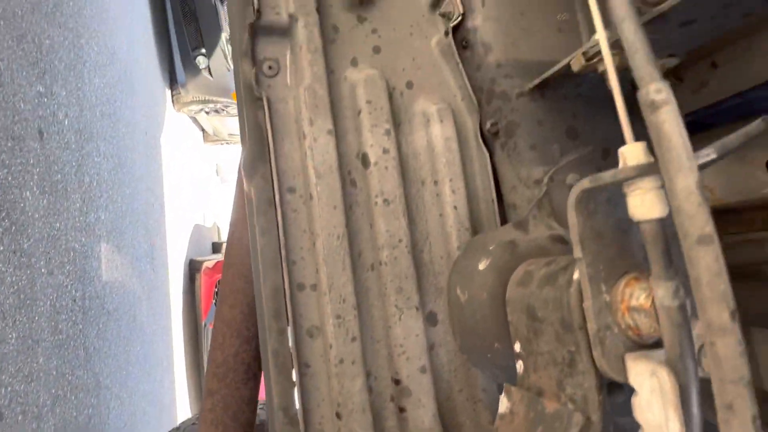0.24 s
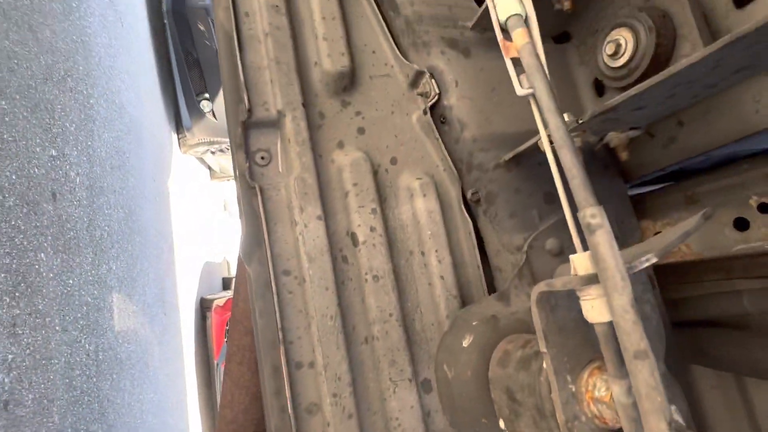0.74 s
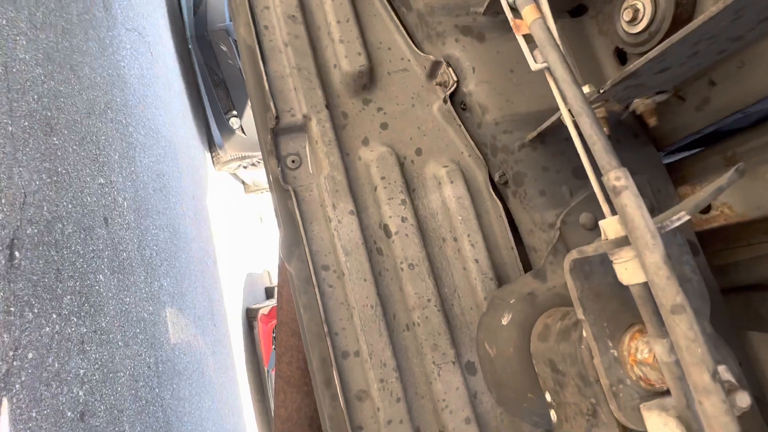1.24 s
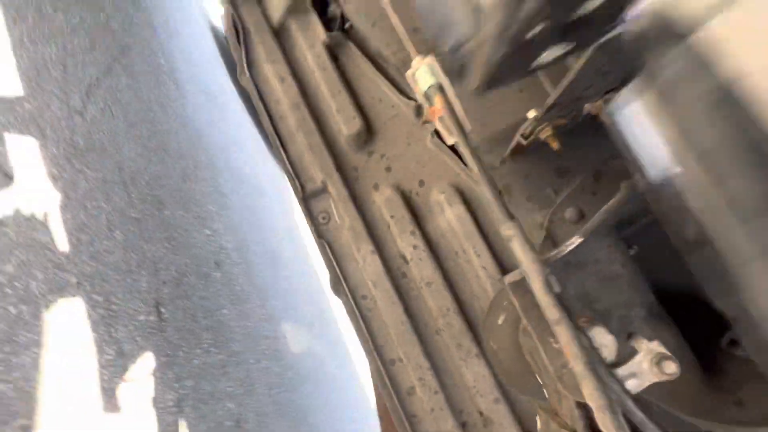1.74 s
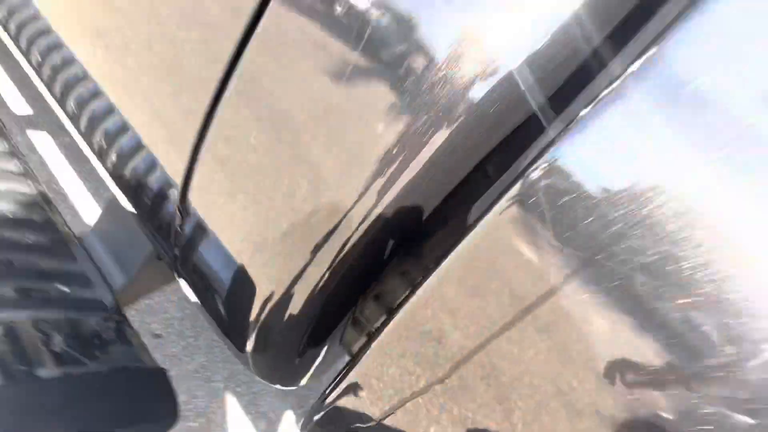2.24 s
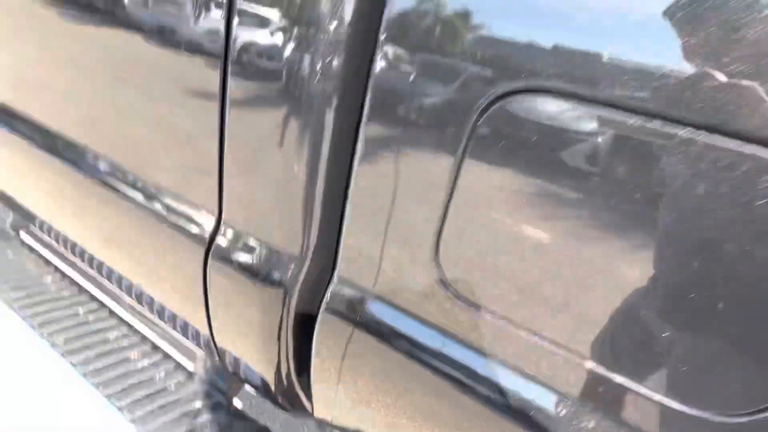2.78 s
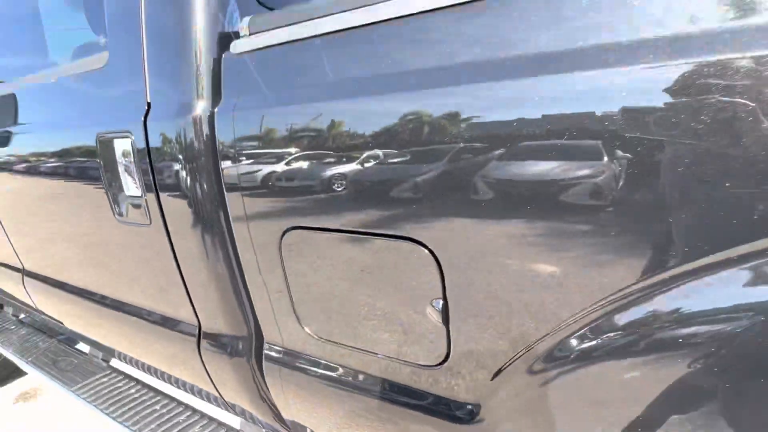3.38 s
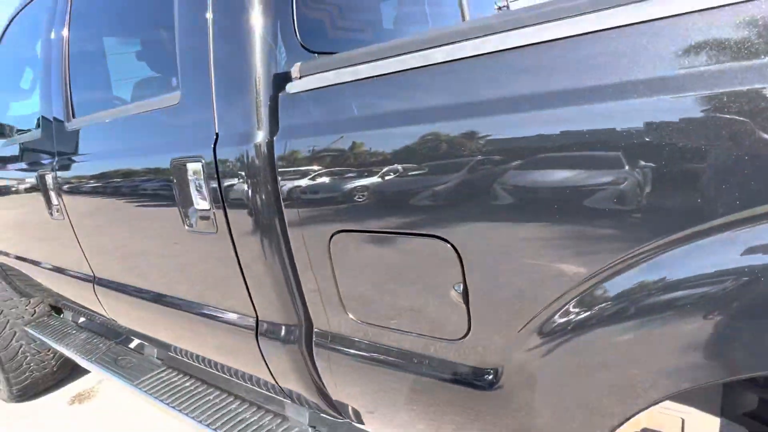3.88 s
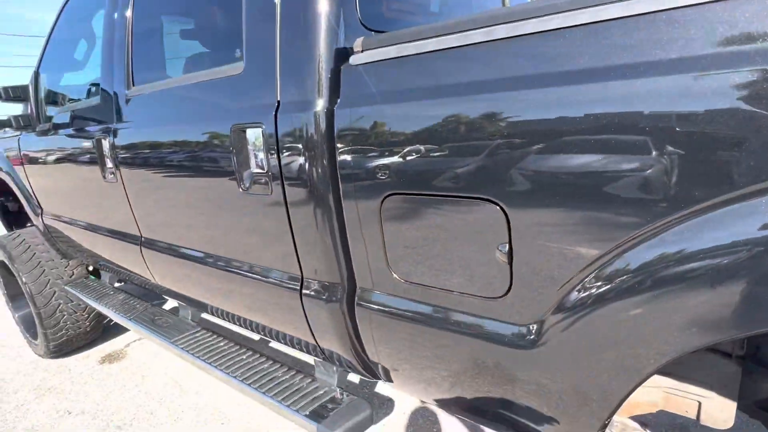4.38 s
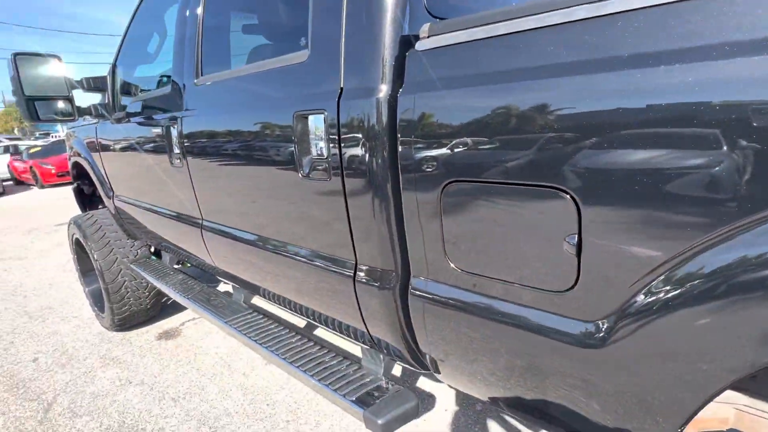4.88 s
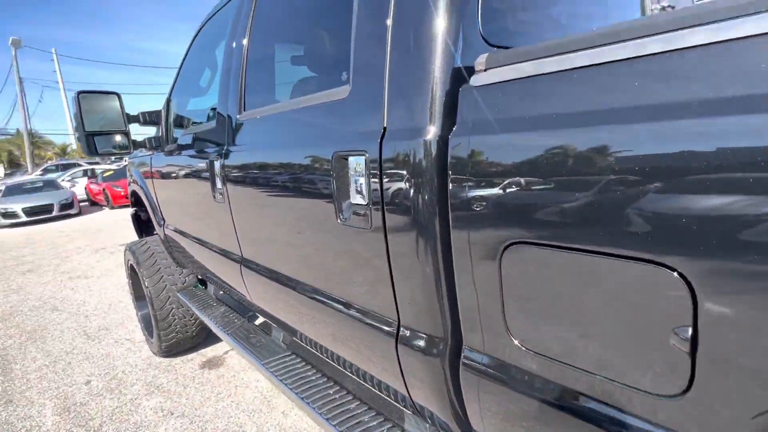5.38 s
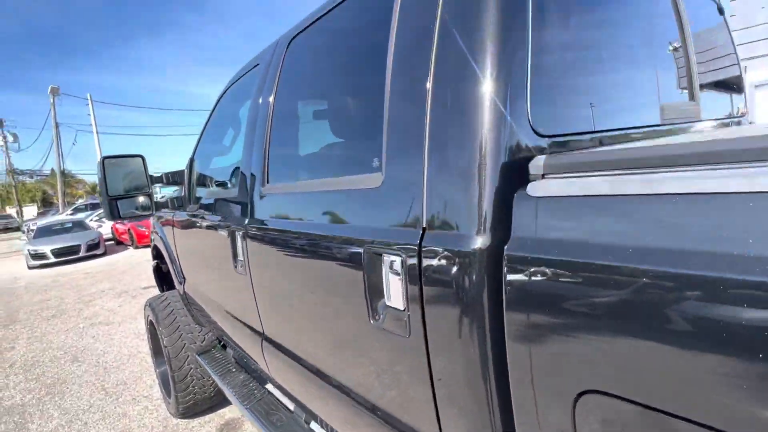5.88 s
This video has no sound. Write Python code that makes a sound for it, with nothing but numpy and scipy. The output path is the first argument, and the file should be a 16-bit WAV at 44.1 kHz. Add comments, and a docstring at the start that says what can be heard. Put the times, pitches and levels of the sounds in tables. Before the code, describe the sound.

Outdoors on a paved lot, a handheld stereo camera starts under a truck: coarse pulsing clatter, metallic chatter and resonant hollow tones over a buzzing idle. Pulled out along the side, it hears softer idling, lumpy low exhaust puffs, airy hiss and a faint narrow whine. Handling thumps and small dry clicks mark the move, then a sharp knock rings the case late.

```python
"""A pickup truck idles on a dealer lot; a camera with two microphone ports is drawn out and along its side.
First, by the frame rail and under the floor, engine lines drone, noise pulsed by the firings clatters, struck
steel rattles and resonant noise rings in the gap above the asphalt. A slower V8 throbs and puffs throughout.
From about 1.7 s the truck recedes in the open: a third motor hums in rising sines and a faint whine passes.
The hand thumps and ticks the camera from 1.8 s on, and a hard tap rings its case near 5.8 s."""
import sys
import numpy as np
from scipy import signal
from scipy.fft import rfft, irfft, next_fast_len
from scipy.io import wavfile
from scipy.ndimage import uniform_filter1d, map_coordinates

SR = 44100
rng = np.random.default_rng(int(sys.argv[2]) if len(sys.argv) > 2 else 0)


def wav_out(sig):
    """Save sig, one row per channel (or a flat mono array), as 16-bit PCM at SR to the path in sys.argv[1]."""
    wavfile.write(sys.argv[1], SR, np.round(np.clip(np.atleast_2d(sig).T, -1, 1) * 32767).astype(np.int16))


N = 270200

TRUCK_FIRING_HZ = 53.3  # mean firings a second
V8_CRANK_HZ = 10.005  # mean turns a second
# the microphone leaves the space under the body: (time [s], fade [s])
LEAVES_BODY = (1.89, 0.49)
# resonances of panels and cavities under the body: (centre [Hz], width [Hz], lift [dB])
UNDER_RESONANCES = [(509, 96, 10.5), (651, 59, 6.5), (868, 30, 10), (2560, 73, 1), (3500, 81, -1)]


def amp(db):
    """Decibels to gain."""
    return 10 ** (np.asarray(db) / 20)


def unit(x):
    """Scale to rms 1."""
    return x / np.sqrt(np.mean(x ** 2) + 1e-20)


def clock():
    """Seconds at each sample."""
    return np.arange(N) / SR


def along(points, hz):
    """Read (frequency [Hz], value) points on a log frequency axis."""
    f, v = np.transpose(points)
    return np.interp(np.log(hz + 1), np.log(f + 1), v)


def curves(rows):
    """One value per sample for each column after the time."""
    s, *columns = np.transpose(rows)
    return [np.interp(clock(), s, column) for column in columns]


def wobble(rate):
    """A smooth random curve, rate knots a second."""
    knots = rng.standard_normal(int(N * rate / SR) + 4)
    return map_coordinates(knots, [np.arange(N) * rate / SR])


def until(s, fade_s):
    """Falls smoothly from 1 to 0, through one half at the time s."""
    return .5 - .5 * np.tanh((clock() - s) / (2 * fade_s))


def swells(rows):
    """Smooth rises or dips in dB, one for each (time [s], change [dB], half-width [s]) row."""
    return sum(db * np.exp(-((clock() - s) / width_s) ** 2) for s, db, width_s in rows)


def by_distance(far_db, growth):
    """A layer's level in dB: far_db far from the truck's engine, plus growth dB for each dB of nearness."""
    # the truck gets quieter as the microphone draws away from its engine: (time [s], level [dB])
    engine_level = [(0, -25.5), (0.2, -26.5), (0.56, -30.5), (0.82, -29), (1.3, -31), (1.85, -34.5),
                    (3.1, -36), (4.1, -40.5), (6.13, -41.5)]
    nearness_db = curves(engine_level)[0] + 41
    return far_db + growth * nearness_db


def places():
    """Gains of the engine lines at two places: beside the frame rail, then below the floor pan."""
    at_rail = until(.43, fade_s=.1)
    below_floor = (1 - at_rail) ** 2 * np.sqrt(until(*LEAVES_BODY))
    return amp(7.5) * at_rail, amp(by_distance(far_db=-17, growth=2.15)) * below_floor


def filtered(x, response):
    """x times a response of frequency."""
    m = next_fast_len(N + SR // 4)
    hz = np.fft.rfftfreq(m, 1 / SR)
    return irfft(rfft(x, m) * response(hz), m)[..., :N]


def rush(spectrum, resonances=()):
    """Stereo noise of rms 1 through resonances; part of it is shared by both ports."""
    # likeness of the two ports: (frequency [Hz], correlation [-1 to 1])
    likeness = [(100, 0.81), (200, 0.71), (340, 0.4), (520, 0.2), (1000, 0.3), (2000, 0.33), (5000, 0.2),
                (9000, 0.25), (12000, 0.45)]

    def response(hz):
        db = along(spectrum, hz)
        for centre, width, lift_db in resonances:
            db = db + lift_db / (1 + (2 * (hz - centre) / width) ** 2)
        angle = np.arccos(np.clip(along(likeness, hz), -1, 1)) / 2
        return amp(db) * [np.cos(angle), np.sin(angle)]

    mid, side = filtered(rng.standard_normal((2, N)), response)
    return unit(np.array([mid + side, mid - side]))


def ring(hz, db, half_width_hz):
    """Stereo noise in one resonance whose pitch and level may move."""
    lowpass = lambda f: 1 / (1 + (f / half_width_hz) ** 2)
    narrow = filtered(rng.standard_normal((2, 2, N)), lowpass)
    # both ports share most of it
    narrow = narrow + 3 * narrow.mean(0)
    # two slow noises on a cosine and a sine make a band around hz
    angle = 2 * np.pi * np.cumsum(hz) / SR
    return amp(db) * unit(narrow[:, 0] * np.cos(angle) + narrow[:, 1] * np.sin(angle))


def spin(hz, unsteady):
    """Cycles made so far by a shaft whose speed hunts by about the share unsteady."""
    return np.cumsum(hz * (1 + unsteady * wobble(7))) / SR


def tone(turns):
    """A sine of rms 1 that follows the turns from a random phase."""
    return np.sqrt(2) * np.sin(2 * np.pi * (turns + rng.random()))


def firings(turns, depth, uneven_db, count):
    """A swell at each firing; each of the count cylinders has its own strength."""
    cylinder_db = uneven_db * unit(rng.standard_normal(count))
    strength = amp(cylinder_db[turns.astype(int) % count])
    return unit(1 + depth * strength * np.sin(np.pi * turns) ** 4)


def strikes(turns, per_firing, scatter_s):
    """Sample numbers of blows at each firing, each a random moment early or late."""
    moments = np.flatnonzero(np.diff((turns + .5).astype(int)))
    beats = np.repeat(moments, per_firing)
    shift = (rng.standard_normal(len(beats)) * scatter_s * SR).astype(int)
    return np.clip(beats + shift, 0, N - 1)


def drone(turns):
    """The truck's engine lines; standing waves under the body favour different ones at each place."""
    # the firing tone dips and swells briefly: (time [s], change [dB], half-width [s])
    firing_swells = [(.36, -11, 0.096), (.72, 5.5, 0.3), (1.0, -6, 0.16), (1.66, -11, 0.11),
                     (1.88, -4, .15)]
    # the microphone passes antinodes of the third harmonic: (time [s], change [dB], half-width [s])
    boom_swells = [(.5, 4.5, 0.17), (1.12, 11, 0.29), (2.15, 5.5, 0.34)]
    # other lines: (multiple of a third of the firing rate, relative level at the rail [dB], under the floor [dB])
    shaft_lines = [(6, -35, -36), (7, -40, -60), (8, -54, -43), (10, -40, -45), (11, -40, -36),
                   (12, -34, -44), (14, -39, -38), (15, -37, -47), (16, -57, -48), (17, -34, -60),
                   (18, -34, -52), (19, -42, -50), (20, -35, -53), (21, -34, -51), (22, -49, -51),
                   (28, -40, -48), (34, -56, -51), (36, -62, -49), (37, -44, -53), (40, -47, -62),
                   (45, -50, -58), (49, -46, -49)]

    firing = amp(by_distance(far_db=-33.5, growth=.43) + swells(firing_swells))
    firing = firing * until(2.1, fade_s=.11)  # lost in the open
    inside = until(2.41, fade_s=.01)
    boom_inside = amp(-33.2 + swells(boom_swells))
    boom_open = amp(by_distance(far_db=-54.5, growth=1.6))
    boom = inside * boom_inside + (1 - inside) * boom_open
    main = firing * tone(turns) + boom * tone(3 * turns)

    rail, floor = places()
    lines = 0
    for multiple, rail_db, floor_db in shaft_lines:
        level = np.hypot(rail * amp(rail_db), floor * amp(floor_db))
        lines = lines + level * amp(1.1 * wobble(4.7)) * tone(multiple * turns / 3)

    # one line stands under the floor pan for a while
    below_pan = (1 - until(.53, fade_s=.037)) * until(1.14, fade_s=.063)
    pan = amp(-34.5 + wobble(4.66)) * below_pan * tone(19 * turns / 3)
    return main + pan + amp(-5.5) * lines


def clatter(turns, v8_turns):
    """Knock and fan rush: noise pulsing with the truck's firings under the body, with the V8's in the open."""
    # noise spectra under the body and beside it: (frequency [Hz], relative density [dB per Hz])
    under_spectrum = [(100, -1.5), (200, -0.5), (340, -3), (430, -12), (560, -14), (900, -8.5),
                      (1300, -4.5), (2000, -13), (3500, -19.5), (4500, -20), (7000, -28), (9000, -30.5),
                      (12000, -35.5), (15500, -39)]
    beside_spectrum = [(85, -11), (170, 0.5), (270, -5.5), (420, -2.5), (620, -4.5), (900, -3.5),
                       (1300, -3.5), (2100, -13), (3000, -15.5), (4700, -26.5), (6600, -25), (9000, -31),
                       (12000, -33), (15500, -37)]
    # resonances in the open: (centre [Hz], width [Hz], lift [dB])
    beside_resonances = [(286, 49, 3.5), (588, 81, 4), (1067, 140, 3.4), (1200, 39, 1.2), (1740, 250, 1),
                         (2220, 330, 1.1), (3160, 260, 1.2), (4680, 870, 9.3), (6400, 380, 3)]
    # the hiss swells gently along the truck's side: (time [s], change [dB], half-width [s])
    hiss_swells = [(4.6, 2.5, 0.85)]

    cover = until(*LEAVES_BODY)
    under = rush(under_spectrum, UNDER_RESONANCES) * firings(turns, depth=.2, uneven_db=3, count=6)
    beside = rush(beside_spectrum, beside_resonances)
    beside = beside * firings(4 * v8_turns, depth=.28, uneven_db=3, count=8)
    both = flicker(patches(np.sqrt(cover) * under + np.sqrt(1 - cover) * beside))

    # the truck's body shades the treble differently from the midrange
    treble = filtered(both, lambda hz: 1 / (1 + (2300 / (hz + 1)) ** 4))
    clatter_db = by_distance(far_db=-37.5, growth=.94) + .68 * wobble(20)
    # the floor pan throws extra hiss down at the microphone
    hiss_db = by_distance(far_db=-37, growth=.13) + 9.5 * cover + swells(hiss_swells) + .52 * wobble(25)
    return amp(clatter_db) * (both - treble) + amp(hiss_db) * treble


def patches(x):
    """Reflections off asphalt and panels lift and sink narrow bands as the microphone moves."""
    # the midrange is coloured most: (frequency [Hz], depth of the patches [dB])
    patch_depth = [(400, 1.8), (1200, 1.5), (2500, 1.2), (8000, 1)]
    hz, _, z = signal.stft(x, SR, nperseg=1024)
    field = uniform_filter1d(rng.standard_normal(z.shape[1:]), size=3, axis=0)
    field = unit(uniform_filter1d(field, size=32, axis=1))
    gain = amp(along(patch_depth, hz)[:, None] * field)
    return signal.istft(z * gain, nperseg=1024)[1][:, :N]


def flicker(x):
    """Different parts ring out by turns: short, narrow patches of the clatter flare and sink."""
    z = signal.stft(x, SR, nperseg=256)[2]
    field = uniform_filter1d(rng.standard_normal(z.shape[1:]), size=7, axis=1)
    field = unit(uniform_filter1d(field, size=2, axis=0))
    gain = unit(amp(2.8 * np.tanh(field)))
    return signal.istft(z * gain, nperseg=256)[1][:, :N]


def knocks(turns):
    """Each combustion lands as two hard raps of uneven strength; they fade with distance and behind the body."""
    # noise spectrum of the raps: (frequency [Hz], relative density [dB per Hz])
    knock_spectrum = [(250, -44), (500, 6), (900, 1.5), (1500, 1), (2000, -27), (3500, -16), (7000, -40),
                      (12000, -60)]
    t60 = .032  # s
    at = strikes(turns, per_firing=2, scatter_s=.0045)
    strength = amp(3 * np.tanh(rng.standard_normal(len(at))))
    blows = np.bincount(at, strength, N)
    decay = amp(-60 * np.arange(SR // 20) / SR / t60)
    bursts = unit(signal.oaconvolve(blows, decay)[:N])
    level = amp(by_distance(far_db=-45.5, growth=.85)) * until(*LEAVES_BODY)
    return level * bursts * rush(knock_spectrum, UNDER_RESONANCES)


def turned(x):
    """As the camera turns, the sound reaches one microphone port before the other."""
    # (time [s], lag of the left port behind the right [ms])
    port_lag = [(0, .15), (.6, .3), (1.3, -.4), (1.8, -.35), (2.3, -.39), (2.6, .36), (3.4, .35), (3.8, .2),
                (4.15, -.17), (6.1, -.12)]
    lag = curves(port_lag)[0] * SR / 1000  # samples
    left = map_coordinates(x[0], [np.arange(N) - .5 * lag], order=5)
    right = map_coordinates(x[1], [np.arange(N) + .5 * lag], order=5)
    return np.array([left, right])


def gap_ring(turns):
    """The knock rings in the gaps between truck and asphalt: resonant noise at moving, wavering pitches."""
    # three rings between floor pan and asphalt, one list each: (time [s], pitch [Hz], level [dB])
    floor_rings = [
        [(.2, 1376, -42), (.28, 1396, -33.5), (.52, 1386, -32.5), (.68, 1450, -33), (.77, 1494, -38.5),
         (.95, 1503, -46), (1.3, 1519, -38)],
        [(0, 1240, -51), (.14, 1250, -25.5), (.3, 1243, -50), (.6, 1254, -46), (.72, 1250, -34),
         (.83, 1260, -28.5), (.89, 1307, -30.5), (.97, 1290, -42), (1.08, 1308, -33), (1.19, 1315, -38),
         (1.27, 1386, -34), (1.42, 1400, -48)],
        [(.75, 1986, -66), (.86, 2000, -45), (.95, 1878, -44), (1.25, 1903, -44), (1.45, 1920, -62)],
    ]
    # a broad hollow tone between microphone, asphalt and body side: (time [s], pitch [Hz])
    hollow_pitch = [(0, 586), (.8, 860), (2.8, 877.3), (4.6, 435.3)]
    # it swells at the edge of the body and along its side: (time [s], change [dB], half-width [s])
    hollow_swells = [(1.35, 8.5, 0.4), (5.2, 2.5, 0.67)]

    narrow = 0
    for hz, db in map(curves, floor_rings):
        narrow = narrow + ring(hz * (1 + .012 * wobble(24)), db, half_width_hz=35)
    hollow_db = by_distance(far_db=-53.5, growth=.68) + swells(hollow_swells)
    hollow = ring(curves(hollow_pitch)[0], hollow_db, half_width_hz=210)
    under_floor = until(1.49, fade_s=.095)
    return (under_floor * narrow + hollow) * firings(turns, depth=.5, uneven_db=4, count=6)


def rattle(turns):
    """Each firing jolts steel parts on the frame; they chatter three times, a little early or late."""
    # ringing steel parts: (frequency [Hz], relative level [dB], t60 [s])
    steel_parts = [(1590, 4, .04), (1766, 1, .11), (2050, 0, .019), (2310, -.5, .045), (2600, 1.5, .04),
                   (2930, 4, .012), (3490, 0, .05), (4100, -4, .01), (5020, -6, .035), (5600, -4.5, .015)]
    # dry scrape of the jolts: (frequency [Hz], relative density [dB per Hz])
    scrape_spectrum = [(900, -31), (2200, 3), (5000, -3), (7500, -7.5), (12000, -41)]

    t, ringing = np.arange(SR // 20) / SR, np.zeros((2, N))
    for hz, db, t60 in steel_parts:
        at = strikes(turns, per_firing=3, scatter_s=.0042)
        jolts = np.zeros((2, N))
        jolts[:, at] = rng.standard_normal((2, len(at)))
        part = amp(db - 60 * t / t60) * np.sin(2 * np.pi * hz * t)
        ringing += signal.oaconvolve(jolts, part[None], axes=1)[:, :N]
    scrape = rush(scrape_spectrum) * firings(turns, depth=.5, uneven_db=3, count=6)
    rail, floor = places()
    # the body hides the rattle once the microphone is out in the open
    level = (amp(-36) * rail + amp(-48.5) * floor) * until(*LEAVES_BODY)
    return level * unit(unit(ringing) + amp(-9) * scrape)


def slow_v8(turns):
    """A deep exhaust throb, four firings a turn, with the side orders of uneven cylinders."""
    # (multiple of the crank rate, mean level [dB])
    crank_orders = [(5.0, -60), (6.0, -61), (6.5, -46), (7.0, -54), (7.5, -58), (8.0, -42.8), (9.0, -48),
                    (10.0, -55.6), (11.0, -59.5), (12.0, -50), (13.5, -52), (14.0, -59), (14.5, -58),
                    (15.5, -59.5), (16.0, -50), (17.0, -76), (18.0, -61), (19.0, -54.5), (19.5, -68),
                    (20.0, -61), (22.5, -66.7), (23.0, -70), (23.5, -58), (24.0, -60), (32.5, -60),
                    (40.0, -74)]
    throb = amp(-38 + .8 * wobble(3.44)) * tone(4 * turns)
    orders = sum(amp(db + 1.5 * wobble(2)) * tone(multiple * turns) for multiple, db in crank_orders)
    # the space under the truck booms on the third harmonic of the throb
    boom = amp(-35) * until(*LEAVES_BODY) * tone(12 * turns)
    return throb + orders + boom


def rumble(v8_turns):
    """Exhaust gas leaves in lumpy puffs: low noise swelling at each V8 firing."""
    # (frequency [Hz], relative density [dB per Hz])
    gas_spectrum = [(20, -50), (30, -28), (43, -4), (48, 6), (58, 5.5), (80, 5.5), (112, -1), (140, -10),
                    (200, -27), (350, -53), (700, -78)]
    # (time [s], change [dB], half-width [s])
    gas_swells = [(1.9, 5.5, 0.59), (4.2, 3, 0.3)]
    gas = rush(gas_spectrum) * firings(4 * v8_turns, depth=.71, uneven_db=1, count=8)
    return amp(by_distance(far_db=-41, growth=.45) + swells(gas_swells)) * gas


def motor():
    """A third motor comes out from behind the truck; its harmonics creep up in pitch and fade."""
    # (multiple of the base tone, level before the fade-in [dB] as it emerges, fall [dB per s])
    motor_orders = [(1, -32, .3), (2, -32, 2.3), (3, -42.5, 2.2), (5, -44, 2.8), (6, -50, 2.2)]
    # its lowest tone dips briefly: (time [s], change [dB], half-width [s])
    lowest_dips = [(3.2, -9, 0.31), (4.6, -10, .15), (5.0, -5, 0.25)]
    emerges_s = 1.66
    turns = spin(53.6 + .17 * clock(), unsteady=.0026)  # Hz, creeping up in Hz per s
    since = clock() - emerges_s
    lowest, *upper = [amp(db - fall * since + 1.2 * wobble(4)) * tone(multiple * turns)
                      for multiple, db, fall in motor_orders]
    emerged = 1 - until(emerges_s, fade_s=.64)
    return emerged * (amp(swells(lowest_dips)) * lowest + sum(upper))


def bumps():
    """The grip shifts: soft pushes thump the camera, and a hard tap rings the modes of its case."""
    # soft pushes: (time [s], level [dB])
    pushes = [(1.83, -22), (2.43, -27)]
    # a hard tap and its bounce: (time [s], level [dB])
    tap_and_bounce = [(5.7867, -22), (5.7935, -31)]
    # modes of the case: (frequency [Hz], relative level [dB], t60 [s])
    case_modes = [(574, -7.5, 0.026), (1160, -11, 0.033), (1467, -14, .02), (2330, -18, .015),
                  (4800, -21, .01)]

    out, t = np.zeros(N), np.arange(SR // 5) / SR
    thump_s = .057
    thump = np.sin(2 * np.pi * 56.4 * t) * np.sin(np.pi * np.minimum(t / thump_s, 1)) ** 2
    tap = sum(amp(db - 60 * t / t60) * np.sin(2 * np.pi * hz * t) for hz, db, t60 in case_modes)
    for rows, sound in ((pushes, thump), (tap_and_bounce, tap)):
        for s, db in rows:
            out[round(s * SR):][:len(t)] += amp(db) * sound
    return out


def whine():
    """A faint, fuzzy whine comes through along the truck's side: noise in a narrow band."""
    # (time [s], level [dB])
    whine_level = [(2, -71), (2.7, -51), (3.6, -51), (4.1, -47), (4.65, -46.5), (5, -66)]
    return ring(np.full(N, 635.5), curves(whine_level)[0], half_width_hz=17)


def handling():
    """Fingers shift on the camera: short bursts of friction, each ringing the case in one band."""
    # (time [s], level [dB], centre [Hz], band edge from the centre [octaves], t60 [s])
    finger_ticks = [(2.045, -39, 8200, 0.18, .016), (2.0513, -33, 7900, 0.2, 0.0088),
                    (2.116, -43, 4750, .03, .12), (3.522, -47, 4700, .04, .12),
                    (3.741, -35.5, 3200, 0.27, 0.06), (3.749, -42.5, 3700, .6, 0.1),
                    (3.797, -47, 4800, 0.4, .11), (5.5405, -37, 3200, .5, .018), (5.769, -41, 1500, .5, .1),
                    (5.7865, -31, 950, .55, .07)]
    out, t = np.zeros((2, N)), np.arange(SR // 8) / SR
    for s, db, hz, width, t60 in finger_ticks:
        edges = np.clip(hz * 2 ** (width * np.array([-1, 1])), 50, SR / 2 - 1)
        band = signal.butter(2, edges, "bandpass", fs=SR, output="sos")
        # part of the noise is shared by both ports
        noise = rng.standard_normal((2, len(t))) + rng.standard_normal(len(t))
        burst = noise * amp(db - 60 * t / t60)
        tick = signal.sosfilt(band, burst) / signal.sosfilt(band, noise).std()
        out[:, round(s * SR):][:, :len(t)] += tick
    return out


def scene():
    """The truck, the slow V8 and the third motor, with the whine and the handling on top."""
    truck = spin(TRUCK_FIRING_HZ, unsteady=.0021)  # counted in firings
    v8 = spin(V8_CRANK_HZ, unsteady=.002)  # counted in crank turns
    near = drone(truck) + turned(clatter(truck, v8) + knocks(truck)) + gap_ring(truck) + rattle(truck)
    return near + slow_v8(v8) + rumble(v8) + motor() + bumps() + whine() + handling()


def record(dry):
    """The two microphone ports differ in colour; both share a steep low cut and a sharp band limit."""
    # (frequency [Hz], left minus right [dB])
    port_difference = [(50, 0), (160, -3), (260, -2.5), (400, -1), (700, 0.5), (1300, 0.5), (2800, -1),
                       (4000, 7.5), (5500, 7.5), (6800, 8.5), (8200, 7.5), (9500, -0.5)]
    low_cut_hz, top_hz = 30, 15800

    def response(hz):
        passband = (hz < top_hz) / np.sqrt(1 + (low_cut_hz / (hz + 1)) ** 12)
        return amp(np.outer([.5, -.5], along(port_difference, hz))) * passband

    return filtered(dry, response)


dry = scene()
out = record(dry)
wav_out(out)
```